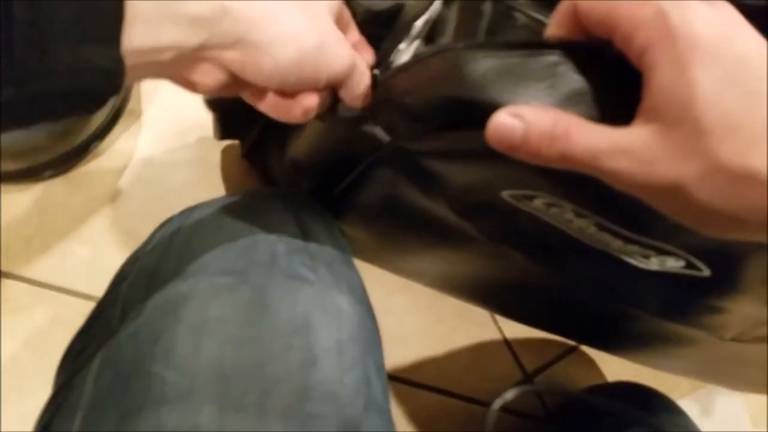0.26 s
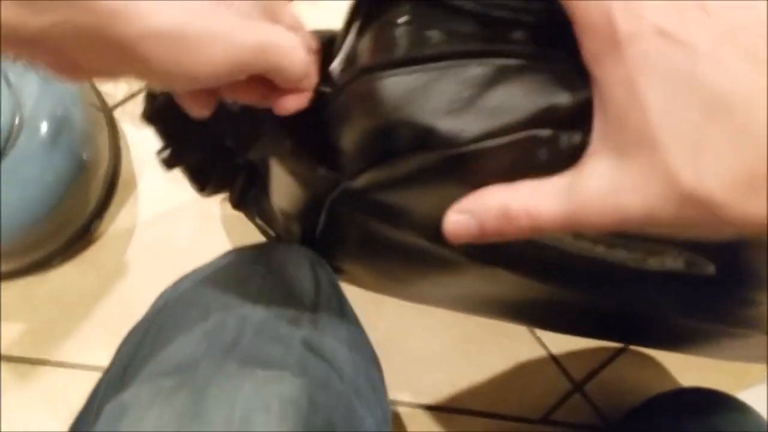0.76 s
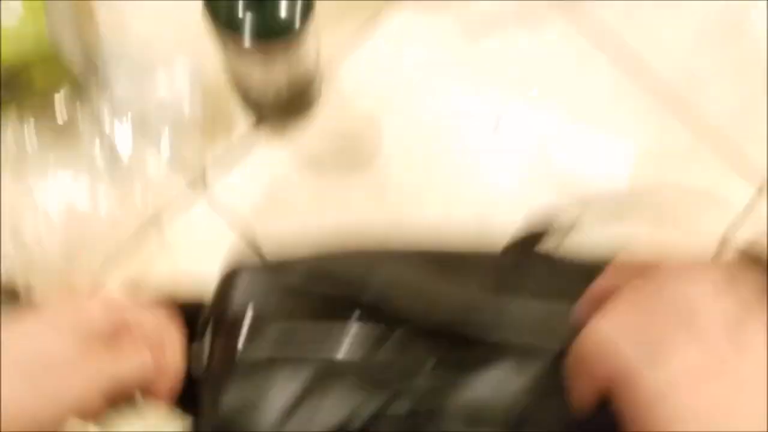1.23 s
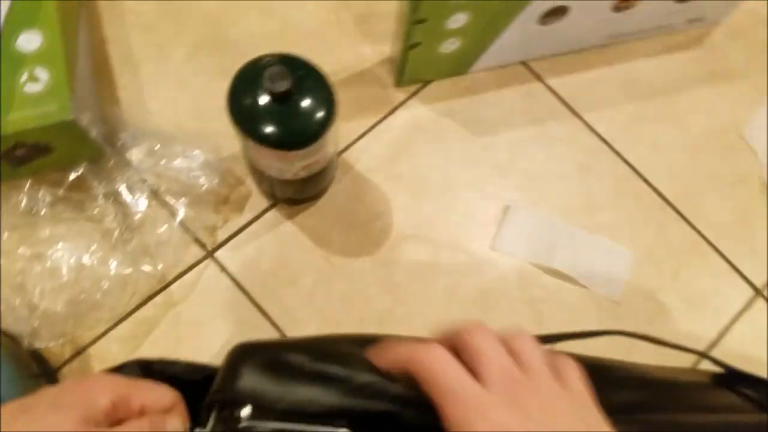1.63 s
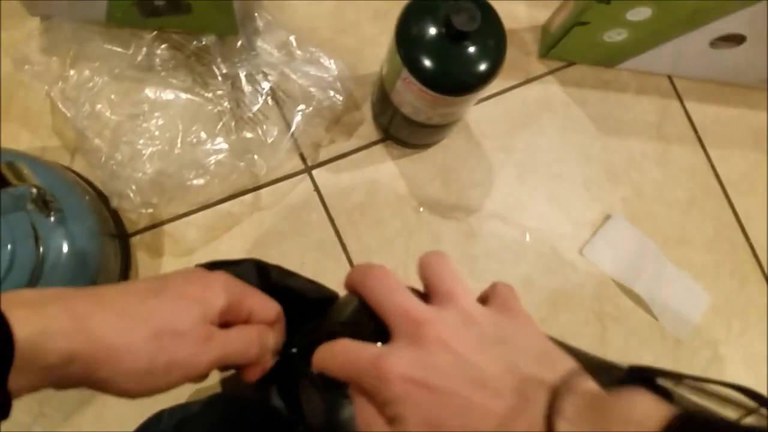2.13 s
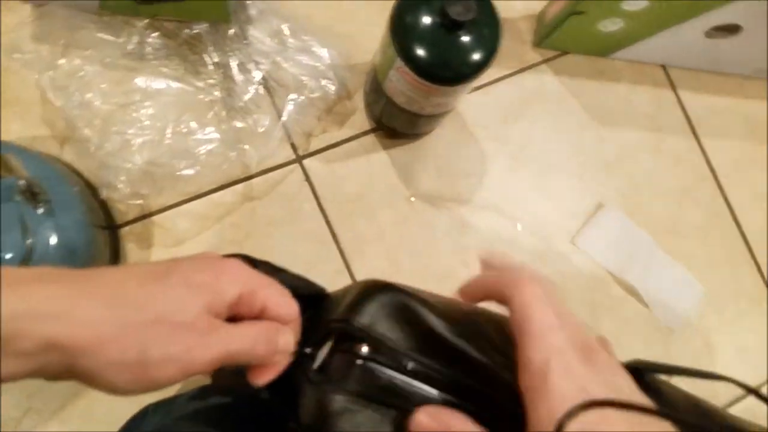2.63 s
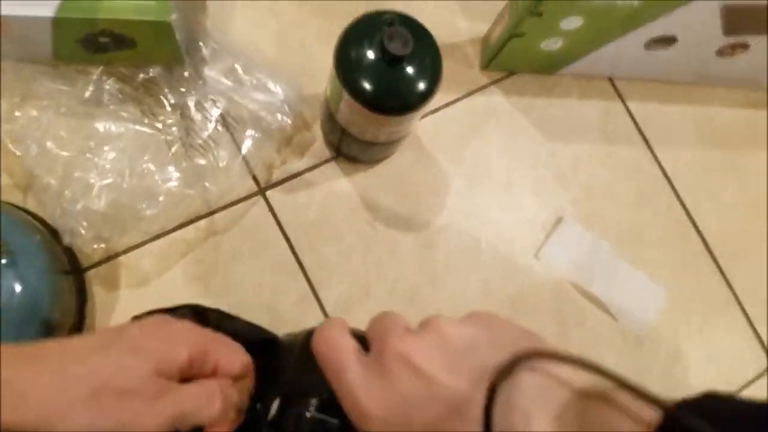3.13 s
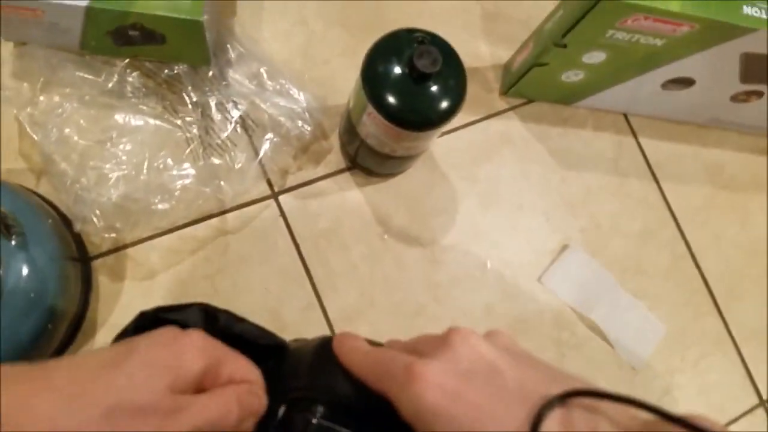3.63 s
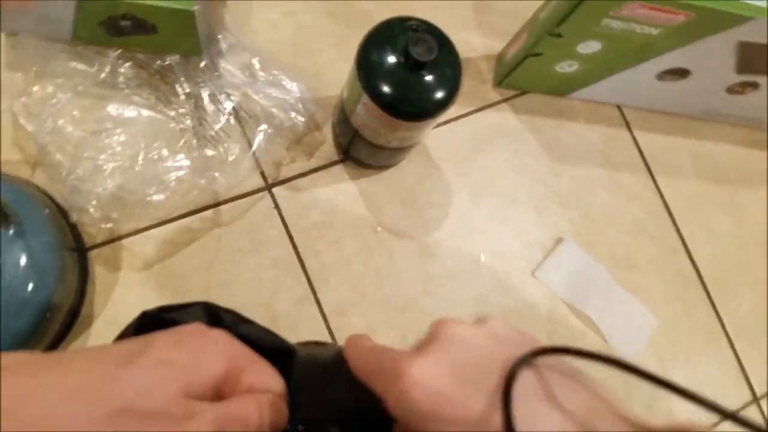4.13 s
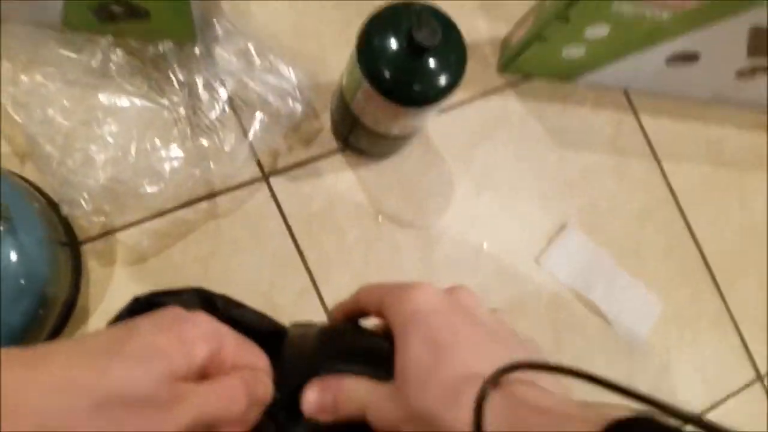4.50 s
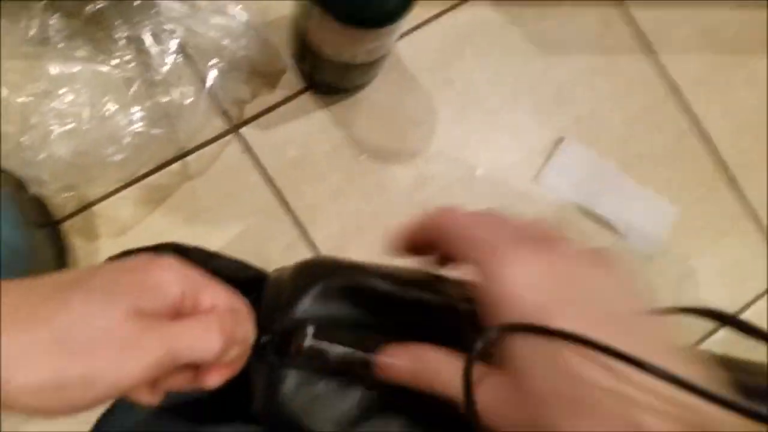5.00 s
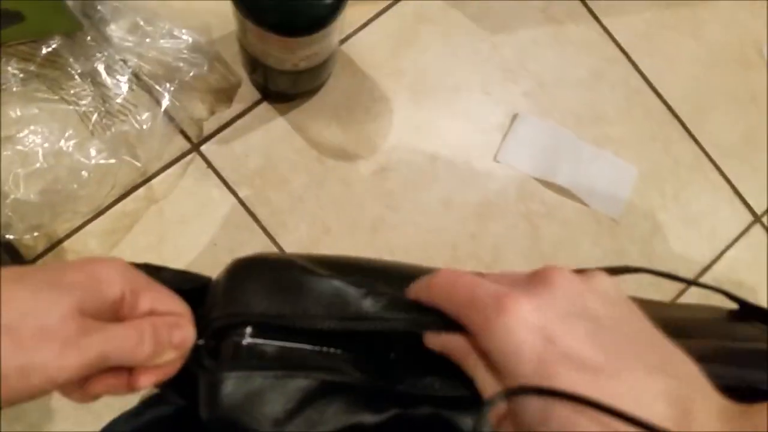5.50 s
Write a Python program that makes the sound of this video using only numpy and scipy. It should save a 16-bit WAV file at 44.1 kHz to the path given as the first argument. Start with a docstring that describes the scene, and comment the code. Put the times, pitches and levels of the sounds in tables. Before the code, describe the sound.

Close, crisp rustling and small sharp clicks from a soft case, two strong low thuds early on, later muffled bumps and faint rattles.

```python
"""Vinyl rustles and snaps as two hands work at the zipper end of a padded case in a tiled room.
The case is set down twice and later shoved about; its hard contents thump and rattle.
Rustle and scuffs are coloured noise, snaps are short cracks; narrow noise bands add soft low and faint tones.
Blows drive damped modes of case and contents; tiles add a short tail, the microphone port a treble peak."""
import sys
import numpy as np
from scipy import signal
from scipy.fft import rfft, irfft, next_fast_len
from scipy.io import wavfile
from scipy.ndimage import uniform_filter1d

SR = 44100
rng = np.random.default_rng(int(sys.argv[2]) if len(sys.argv) > 2 else 0)


def file_out(sig):
    """Save sig as 16-bit WAV at sys.argv[1]."""
    # one column per channel
    cols = np.atleast_2d(sig).T
    # limit, then scale
    lim = np.clip(cols, -1, 1)
    pcm = np.round(lim * 32767).astype(np.int16)
    wavfile.write(sys.argv[1], SR, pcm)


N = 253605

# vinyl noise spectrum: frequency_hz, density_db [dB per Hz, relative]
VINYL_SPECTRUM = [(900, -39), (2000, -28), (4500, -31), (6200, -16.5), (7500, -6.5), (8900, 4), (10500, -6),
                  (12000, -11.5), (16000, -7.5)]


def undb(db):
    """Gain of a level in dB."""
    return 10 ** (np.asarray(db) / 20)


def unit(x):
    """Scale to rms 1."""
    return x / np.sqrt(np.mean(x ** 2))


def colour(x, points):
    """Shape a spectrum by (Hz, dB) points, interpolated over log frequency."""
    hz, db = np.transpose(points)
    size = next_fast_len(len(x))
    f = np.maximum(np.arange(size // 2 + 1) * SR / size, 1)
    gain = undb(np.interp(np.log(f), np.log(hz), db))
    return irfft(rfft(x, size) * gain, size)[:len(x)]


def walk(rate_hz):
    """Random levels held 1 / rate_hz seconds and smoothed twice; spread near 1."""
    hold = int(SR / rate_hz)
    steps = np.repeat(rng.standard_normal(N // hold + 1), hold)
    return 1.3 * uniform_filter1d(uniform_filter1d(steps, hold), hold)[:N]


def grains(rate_hz, spread_db):
    """Random tiny impulses, a few much larger than the rest, at rms 1."""
    hit = rng.random(N) < rate_hz / SR
    size_db = spread_db * np.minimum(rng.exponential(size=N), 5)
    return unit(hit * rng.standard_normal(N) * undb(size_db))


def swell(starts_s, levels_db, rises_s, t60s_s):
    """Envelopes that rise and die away, added in power."""
    power = np.zeros(N)
    for start_s, db, rise_s, t60_s in zip(*np.broadcast_arrays(starts_s, levels_db, rises_s, t60s_s)):
        i = int(start_s * SR)
        t = np.arange(min(N - i, SR)) / SR
        rise_s = max(rise_s, 1e-4)
        decay = undb(db - 60 * np.maximum(t - rise_s, 0) / max(t60_s, 1e-3))
        power[i:i + len(t)] += (decay * np.minimum(t / rise_s, 1)) ** 2
    return np.sqrt(power)


def ring(x, hz, t60_s):
    """One damped mode; noise passes at about the same power whatever the damping."""
    r = np.exp(-np.log(1000) / (t60_s * SR))
    poles = [1, -2 * r * np.cos(2 * np.pi * hz / SR), r * r]
    return signal.lfilter([1, 0, -1], poles, x) * np.sqrt(1 - r)


def answer(push, hz, db, t60_s, centre_hz, slope_db_per_octave):
    """Modes answer a push; those far from the centre of its energy are driven less."""
    scatter_db = 2.5 * rng.standard_normal(len(hz))  # random level of each mode, drawn anew at each call
    gain = undb(db + scatter_db - slope_db_per_octave * abs(np.log2(hz / centre_hz)))
    gain *= (-1) ** np.arange(len(hz)) / np.sqrt(np.sum(gain ** 2))
    return sum(g * ring(push, f, d) for f, g, d in zip(hz, gain, t60_s))


def body(push, centre_hz):
    """The padded case and its contents ring in low, quickly damped modes."""
    # case modes: frequency_hz, relative_db, t60_s
    case_modes = [(77, -7.5, 0.16), (136.6, -2.5, 0.069), (182, 1, 0.093), (228, 2, 0.036),
                  (269.3, 3.5, 0.045), (348.4, 1, 0.073), (414, -2, 0.046), (501, 0.5, 0.059),
                  (622.4, -2, 0.047), (696.2, -2.5, 0.049), (809, -0.5, 0.028), (933, -3.5, 0.065),
                  (1018, -9, 0.031)]
    return answer(push, *np.transpose(case_modes), centre_hz, 3.1)


def rattle(push, centre_hz):
    """Hard parts knock inside: wide modes, the wider the faster they decay."""
    # hard parts: frequency_hz, nominal_width_hz, relative_db
    hard_parts = [(1213, 160, -10), (1665, 320, -4.5), (2080, 560, -4), (2248, 210, -7), (2770, 250, -11.5),
                  (3190, 500, -7.5), (3755, 520, -5.5), (4326, 680, -5.5), (5506, 1000, -6.5),
                  (6500, 420, -6)]
    hz, width_hz, db = np.transpose(hard_parts)
    return answer(push, hz, db, 1.47 / (0.87 * width_hz), centre_hz, 5.5)


def room_air():
    """Quiet room: steady noise, strongest at low frequencies."""
    # room noise spectrum: frequency_hz, density_db [dB per Hz, relative]
    air_spectrum = [(18, -27.5), (30, -9.5), (300, -11.5), (520, -7), (900, -17), (1700, -17), (5000, -27),
                    (15000, -37.5)]
    air_db = -73
    return undb(air_db) * unit(colour(rng.standard_normal(N), air_spectrum))


def room(x, wet_db, low_t60_s=0.17, high_t60_s=0.15):
    """Tiled walls: a dense tail whose treble dies first."""
    t = np.arange(SR // 2) / SR
    low = signal.lfilter([.2], [1, -.8], rng.standard_normal(len(t))) * undb(-60 * t / low_t60_s)
    high = .4 * rng.standard_normal(len(t)) * undb(-60 * t / high_t60_s)
    tail = (low + high) * (t > .006)
    return x + undb(wet_db) * signal.fftconvolve(x, tail / np.sqrt(np.sum(tail ** 2)))[:N]


def shuffle(hands_db):
    """The padding rubs and shifts as the fingers work, exciting the case softly."""
    drive_db, follow_db_per_db, smoothing_s = -71.5, 0.35, 0.13  # drive at a rustle of -51 dB
    smooth_hands_db = uniform_filter1d(hands_db, int(smoothing_s * SR))
    db = drive_db + follow_db_per_db * (smooth_hands_db + 51)
    return undb(db + 3.0 * walk(8.3)) * body(rng.standard_normal(N), 350)


def narrow_bands():
    """Soft low bands, faint tones and a short knock near 3.03 s: slow random swings carried by a tone."""
    # narrow noise bands: start_s, level_db, pitch_hz, pole_width_hz (each of two smoothing poles), duration_s
    bands = [(.02, -69.5, 520, 47, .45), (.22, -75.5, 1470, 100, 0.35), (.26, -50.5, 212, 75, 0.1),
             (.67, -56, 215.5, 100, 0.15), (.82, -60.5, 250.6, 120, 0.15), (1.36, -50, 72.8, 13, .2),
             (1.44, -40, 286, 50, 0.11), (1.69, -53, 1700, 130, .16), (3.025, -50.5, 2550, 820, .07),
             (3.03, -56, 549, 58, .09), (3.03, -63, 95, 44, .07), (3.125, -57, 2170, 520, .037),
             (3.64, -48, 202, 58, 0.078), (4.44, -41.5, 334, 65, 0.091), (4.84, -54.5, 5620, 1200, 0.35),
             (5.59, -53.5, 213.8, 65, 0.13)]
    out = np.zeros(N + SR)
    swing = np.resize(rng.standard_normal(N) + 1j * rng.standard_normal(N), N + SR)
    for k, (start_s, db, pitch_hz, width_hz, duration_s) in enumerate(bands):
        i, size = int(start_s * SR), int(duration_s * SR)
        r = np.exp(-np.pi * width_hz / SR)
        slow = np.roll(swing, k * size)[i:i + size]
        slow = signal.lfilter([np.sqrt(1 - r * r)], [1, -r], slow)
        slow = signal.lfilter([1 - r], [1, -r], slow)
        tone = np.exp(2j * np.pi * pitch_hz * np.arange(size) / SR)
        out[i:i + size] += undb(db) * np.hanning(size) ** 0.22 * (slow * tone).real
    return out[:N]


def thumps():
    """A cluster of soft blows as the contents settle, with rattle and a scuff of vinyl on tile."""
    # thumps and shoves: start_s, push_db, body_centre_hz, rattle_db (against push), length_s
    thump_events = [(0.0, -46.5, 365, 2.5, 0.054), (0.279, -58.5, 227, -8, 0.19),
                    (0.68, -59.5, 230, -4, 0.19), (0.852, -65.5, 175, -8, 0.24),
                    (0.992, -55.5, 160, 1, 0.072), (1.309, -12.5, 470, -14.5, 0.055),
                    (1.329, -12.5, 273, -7, 0.14), (1.479, -36.5, 436, -10.5, 0.13),
                    (1.604, -15.5, 265, -16, 0.084), (1.628, -19, 370, -6.5, 0.1),
                    (1.685, -29.5, 278, -4.5, 0.15), (1.749, -42, 275, -4, 0.15),
                    (2.525, -63, 297, -10.5, 0.15), (2.692, -60, 528, -18, 0.12),
                    (3.03, -49.5, 536, 2, 0.05), (3.187, -53.5, 273, -26, 0.15),
                    (3.473, -56.5, 181, -9.5, 0.17), (3.632, -41.5, 225, -13, 0.11),
                    (3.701, -35, 540, -9.5, 0.09), (3.769, -43, 226, -8.5, 0.2),
                    (3.831, -34.5, 242, -4.5, 0.092), (4.271, -41.5, 203, -5.5, 0.16),
                    (4.421, -46.5, 353, -35, 0.18), (4.464, -39.5, 362, -26, 0.054),
                    (4.574, -32, 296, -17, 0.14), (4.719, -27.5, 816, -10.5, 0.075),
                    (4.804, -31.5, 805, -15, 0.078), (4.868, -44, 510, -6.5, 0.16),
                    (4.962, -46.5, 119, -5, 0.19), (5.073, -26, 167, -11, 0.11),
                    (5.123, -29.5, 282, -14, 0.055), (5.165, -36, 337, -15.5, 0.12),
                    (5.606, -57.5, 180, -16.5, 0.072), (5.697, -56.5, 239, -24, 0.12)]
    # scuff spectrum: frequency_hz, density_db [dB per Hz, relative]
    scuff_spectrum = [(2500, -7.5), (4500, -16), (6500, 0.5), (9000, 12), (12000, -5.5), (16000, 2)]
    rise_s, sink_db, end_t60_s = 0.01, 20, 0.036
    rattle_centre_hz, rattle_extra_fade = 1720, 0.29  # extra fade: dB per dB of push fade
    scuff_db, scuff_db_per_rattle_db, scuff_extra_fade = 1.5, 1.625, 0.59
    out, size = np.zeros(N + SR), SR // 2
    t = np.arange(size) / SR
    blows = np.resize(unit(rng.standard_normal(N) + .4 * grains(300, 2.0)), N + SR)
    scuff = colour(rng.standard_normal(N) * undb(1.7 * walk(60)), scuff_spectrum)
    scuff = np.resize(unit(scuff), N + SR)
    for start_s, db, body_hz, rattle_db, length_s in thump_events:
        i = int(start_s * SR)
        # the thump fades slowly for its length, then stops quickly
        fade_db = -sink_db * np.maximum(t - rise_s, 0) / length_s
        fade_db -= 60 * np.maximum(t - length_s, 0) / end_t60_s
        push = np.minimum(t / rise_s, 1) * undb(db + fade_db)
        hit = push * blows[i:i + size]
        scrape_db = scuff_db + scuff_db_per_rattle_db * rattle_db + scuff_extra_fade * fade_db
        scrape = undb(scrape_db) * push * scuff[i:i + size]
        thud = body(hit, body_hz)
        knocks = undb(rattle_db) * rattle(hit * undb(rattle_extra_fade * fade_db), rattle_centre_hz)
        out[i:i + size] += thud + knocks + scrape
    return out[:N]


def snaps():
    """Each snap: a brief crack, a duller knock into case and contents and a short rustle."""
    # creases and zipper tab: start_s, crack_db, knock_db (against crack)
    snap_events = [(0.0403, -32.5, -24), (0.2433, -33, -28), (0.2563, -25, -26.5), (0.2976, -34.5, -36),
                   (0.3536, -35, -20), (0.8081, -39, -18), (0.8684, -33.5, -30.5), (0.9428, -23.5, -36),
                   (0.9882, -15, -32), (1.3124, -20.5, -33), (1.5683, -40, -36.5), (1.5943, -29.5, -18),
                   (1.7534, -22, -15), (2.4987, -42, -36.5), (2.5381, -36, -42), (2.605, -28, -42),
                   (2.6135, -33, -42), (2.6858, -30, -43), (2.7197, -30, -37), (2.7656, -32, -45),
                   (2.7765, -38, -39), (3.026, -26, -11), (3.1363, -29.5, -20), (3.3488, -44.5, -37.5),
                   (3.4196, -34.5, -41.5), (3.5418, -39.5, -45.5), (3.5912, -29, -34.5),
                   (3.6196, -33.5, -22), (3.6376, -21.5, -48), (3.707, -28, -8.5), (3.7264, -18, -9.5),
                   (3.8352, -18, -14), (4.2672, -27.5, -23), (4.3799, -26.5, -48), (4.7247, -18, -17),
                   (4.8145, -20.5, -13.5), (5.1243, -23, -12), (5.2799, -34.5, -23), (5.3652, -31.5, -40),
                   (5.3787, -21, -48)]
    # crack spectrum: frequency_hz, density_db [dB per Hz, relative]
    crack_spectrum = [(2500, -32), (5000, -29), (7000, -6.5), (9000, 9.5), (11000, -3.5), (13000, -9),
                      (16500, -2.5)]
    tail_db = -16.5  # against the crack
    start_s, db, knock_db = np.transpose(snap_events)
    edge = np.sign(rng.standard_normal(N))
    crack = colour(swell(start_s, db, 0.00029, 0.0068) * edge, crack_spectrum)
    crack /= np.std(colour(edge, crack_spectrum))
    tail_noise = unit(colour(rng.standard_normal(N), VINYL_SPECTRUM))
    tail = swell(start_s, db + tail_db, 0.0013, .07) * tail_noise
    knock = swell(start_s, db + knock_db, 0.00036, 0.0073) * np.sign(rng.standard_normal(N))
    return crack + tail + undb(4.5) * rattle(knock, 2400) + body(knock, 800)


def sheen(x):
    """The top of the vinyl hiss, above the port resonance."""
    return signal.sosfilt(signal.butter(4, 10500, "high", fs=SR, output="sos"), x)


def rustle(hands_db):
    """Vinyl slides under fingers: hiss with tiny crease ticks; the top flickers a little alone."""
    # sheen against the rest of the rustle: time_s, level_db
    sheen_levels = [(0, -9), (.3, -7), (.6, -20), (.9, -6), (1.4, -15), (1.75, -10), (2.05, -3), (2.6, -12),
                    (3.1, -5), (3.5, -14), (3.9, -8), (4.4, -9), (4.7, -15), (4.999, -6), (5.3, -14.5),
                    (5.75, -12.5)]
    slide = rng.standard_normal(N) * undb(2.8 * walk(45)) + 0.61 * grains(980, 2.4)
    slide = colour(slide, VINYL_SPECTRUM)
    top = sheen(slide)
    level = undb(hands_db + 1.3 * walk(33))
    top_db = np.interp(np.arange(N) / SR, *np.transpose(sheen_levels)) + 2.1 * walk(20)
    return level * (unit(slide - top) + undb(top_db) * unit(top))


def scene():
    """Hands and case ring in the room; padding and air are added without the tail."""
    # fingers on the vinyl: time_s, rustle_db
    hand_levels = [(0.0, -45.5), (0.22, -53), (0.27, -44.5), (0.42, -64.5), (0.6, -43.5), (0.79, -55.5),
                   (1.0, -41), (1.29, -49.5), (1.52, -60.5), (1.65, -43), (1.78, -41), (1.93, -55),
                   (2.03, -55.5), (2.1, -70), (2.25, -54.5), (2.46, -73.5), (2.51, -48.5), (2.62, -46.5),
                   (2.82, -53), (2.95, -44), (3.14, -46.5), (3.26, -73.5), (3.36, -63), (3.499, -51.5),
                   (3.73, -51), (3.92, -54.5), (4.05, -76), (4.18, -55.5), (4.38, -49), (4.69, -59.5),
                   (4.79, -48.5), (5.11, -43), (5.241, -57.5), (5.322, -39.5), (5.39, -49.5), (5.53, -59.5),
                   (5.671, -47.5), (5.75, -52)]
    hands_db = np.interp(np.arange(N) / SR, *np.transpose(hand_levels))
    close = rustle(hands_db) + snaps() + thumps() + narrow_bands()
    return (room(close, -19.0) + shuffle(hands_db) + room_air())[None]


def record(dry):
    """Port resonance, a step down at the very top, then the cut-off; the converter sits off zero."""
    port_hz, port_width_hz, port_db = 8360, 530, 2
    step_hz, step_db = 15750, -24
    cutoff_hz, offset = 16950, -.0005  # offset in full scale
    b, a = signal.iirpeak(port_hz, port_hz / port_width_hz, fs=SR)
    x = dry + (undb(port_db) - 1) * signal.lfilter(b, a, dry)
    x = colour(x[0], [(step_hz - 50, 0), (step_hz + 50, step_db)])[None]
    cutoff = signal.ellip(10, .2, 70, cutoff_hz, fs=SR, output="sos")
    return signal.sosfilt(cutoff, x) + offset


dry = scene()
out = record(dry)
file_out(out)
```